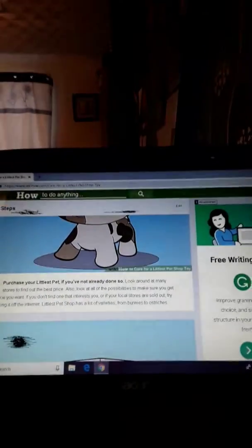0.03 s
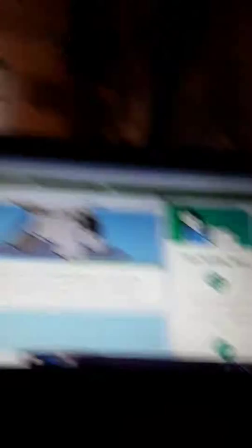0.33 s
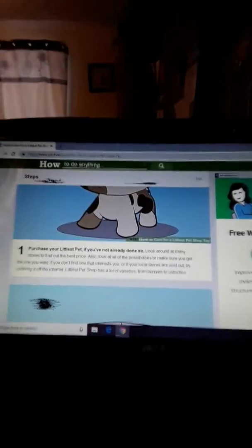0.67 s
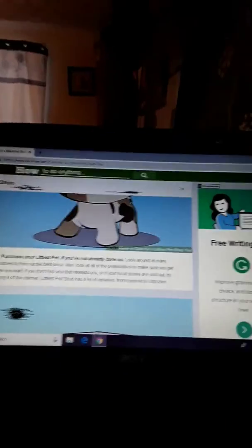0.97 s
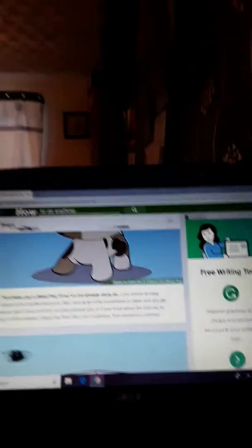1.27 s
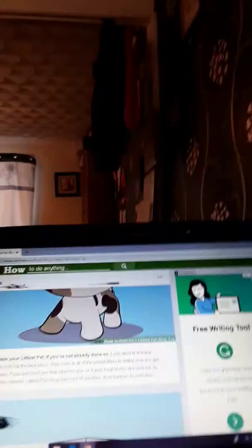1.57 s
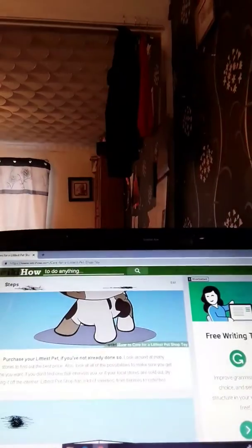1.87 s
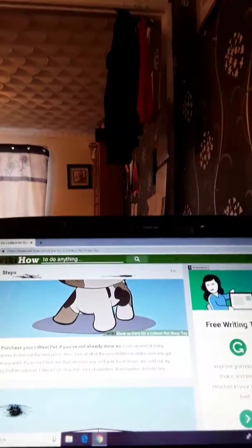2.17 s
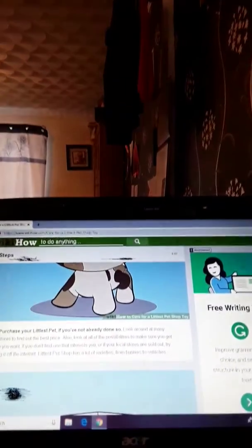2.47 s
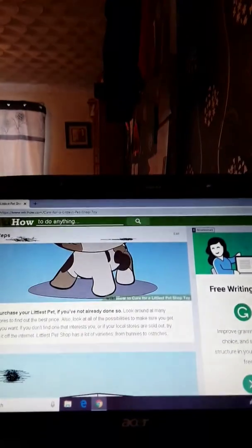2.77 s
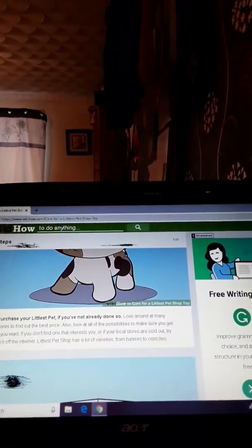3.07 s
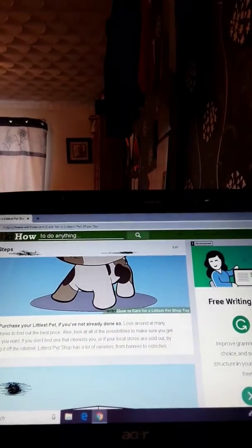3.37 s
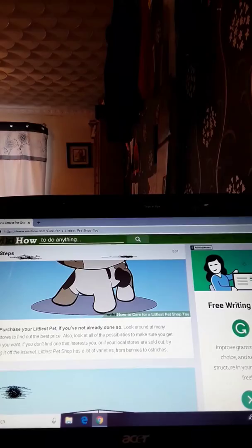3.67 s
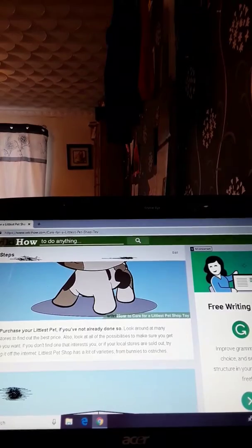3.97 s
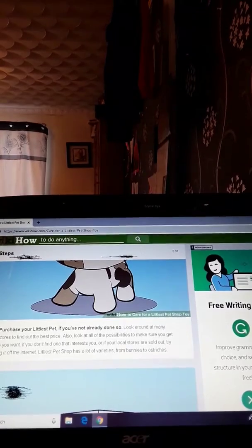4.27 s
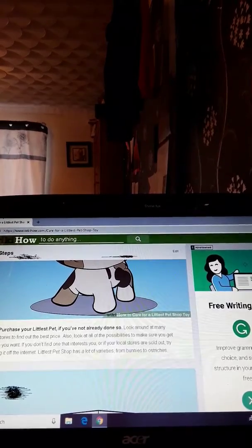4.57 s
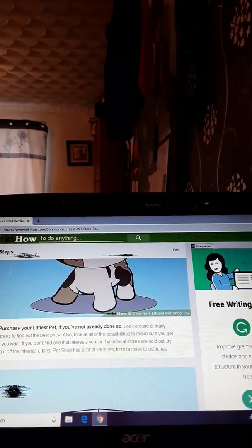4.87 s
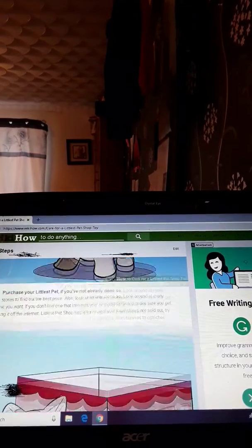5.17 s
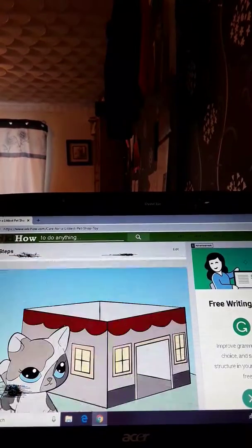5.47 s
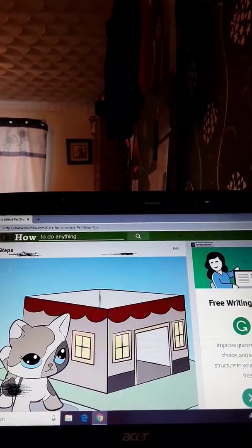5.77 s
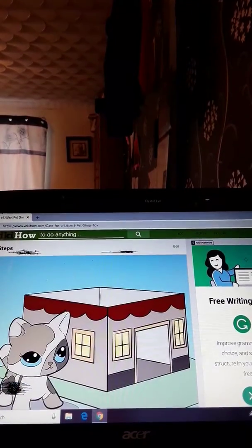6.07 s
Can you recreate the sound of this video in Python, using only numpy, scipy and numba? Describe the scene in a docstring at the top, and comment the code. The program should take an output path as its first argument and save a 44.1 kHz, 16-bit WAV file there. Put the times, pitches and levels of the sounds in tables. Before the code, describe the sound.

Close fingers rub and click on a microphone, then cover it, turning muffled with two heavy bumps and soft taps.

```python
"""Skin rubs and ticks, close and bright, as a hand shifts its grip on a small device in a quiet room. A finger
slides over the microphone port, whose air resonance sinks until everything is muffled. Two heavy shoves boom
and scrape through the case, the fingertip pops softly as it presses and lifts, and the hand settles to a low
rumble."""
import sys
import numpy as np
from scipy import signal
from scipy.fft import rfft, irfft
from scipy.io import wavfile
from scipy.ndimage import uniform_filter1d
from numba import njit

SR = 44100
rng = np.random.default_rng(int(sys.argv[2]) if len(sys.argv) > 2 else 0)


def digitize_waveform(pressure):
    """Quantize a signal to 16-bit integers and store it at the path in sys.argv[1].

    Rows of a 2-D input are taken as channels; values are limited to [-1, 1].
    """
    field = np.atleast_2d(pressure).T
    bounded = np.clip(field, -1, 1)
    quanta = np.round(bounded * 32767).astype(np.int16)
    wavfile.write(sys.argv[1], SR, quanta)


N = 278712
TIME = np.arange(N) / SR
CUTOFF_HZ = 15700

# Tone curves for the noise layers. Each row: frequency in Hz, relative level in dB.
ROOM_TONE = [(240, -29), (400, 0.5), (481, -8), (860, -12.5), (1220, -17.5), (1510, -21), (2360, -22.5),
             (4920, -35), (11600, -32), (15500, -23.5)]
RUMBLE_TONE = [(20, -12.5), (45, -7), (75, -3.5), (110, -7.5), (170, -15.5), (250, -25.5), (400, -37.5),
               (800, -61), (2000, -110)]
DRAG_TONE = [(20, -31.5), (45, -8), (80, 1), (170, 2), (300, -1), (450, -5.5), (700, -14), (1500, -64)]
HISS_TONE = [(1000, -39), (2200, -8), (3400, -4), (5000, -2), (8000, -3), (16000, -0.5)]
OPEN_RASP_TONE = [(150, -20), (350, 2), (600, -3), (1000, -2), (1800, -5), (2800, -9.5), (4000, -15),
                  (6000, -22), (16000, -45)]
COVERED_RASP_TONE = [(150, -11.5), (350, -6.5), (550, 5), (750, 2.5), (1100, -1.5), (1800, -8.5),
                     (2800, -15.5), (5000, -36), (16000, -39.5)]
BOOM_TONE = [(20, -20.5), (42, -24.5), (64, 10.5), (85, 2.5), (130, 6), (230, 0.5), (350, 1.5), (500, -4),
             (700, -23), (1500, -64)]
SCRAPE_TONE = [(250, -20), (500, -8), (750, 4), (1500, -7.5), (2800, -16.5), (5000, -15), (16000, -26)]
# The finger closes the port. Each row: time in seconds, air resonance in Hz, damping as 1/Q.
PORT_CLOSING = [(0, 8210, 0.07), (1.0, 8180, 0.28), (1.42, 8200, 0.21), (1.48, 7160, 0.44),
                (1.53, 5300, 0.59), (1.61, 4840, 0.32), (1.70, 3620, 0.49), (1.80, 2784, 0.73),
                (6.3, 2844, 0.92)]
# Peaks and dips of the case, plus the microphone's thin ring near 15 kHz.
# Each row: centre in Hz, width in Hz, boost in dB.
DEVICE_BANDS = [(122, 61, 3), (220, 8.3, 1), (360, 84, -1), (437, 44, 1), (750, 12, 0), (1620, 55, 1.5),
                (1999, 52, 1.5), (5800, 3900, -0.5), (14910, 1000, 12)]
# A thin, faint whine. Each row: start and end in seconds, centre and width in Hz, level in dB.
WHINE = [(3.13, 3.68, 13700, 504, -82), (3.13, 3.68, 13370, 302, -83.5)]
# Skin grips and chafes, from a broad rasp to a narrow squeak. Each row reads as for the whine.
SQUEAKS = [(0.154, 0.302, 2230, 260, -45), (.385, .45, 3640, 2200, -22.5), (.715, 0.782, 750, 464, -34),
           (.859, .8635, 2350, 2900, -22.5), (.91, 0.952, 1130, 300, -35.5),
           (1.194, 1.216, 3700, 400, -35.5), (1.291, 1.35, 3870, 450, -41.5),
           (1.535, 1.539, 2430, 3350, -28), (1.52, 1.64, 5100, 1380, -42), (1.674, 1.717, 1320, 710, -31.5),
           (3.565, 3.62, 750, 660, -52), (3.72, 3.79, 690, 399, -62.5)]
# The fingertip presses and lifts. Each row: start in seconds, level in dB, pitch in Hz,
# seconds to fade by 60 dB.
POPS = [(0.3, -14.5, 148.8, .018), (0.334, -23.5, 178.9, 0.011), (0.461, -19, 136, .04),
        (1.022, -22, 329.4, 0.055), (1.037, -11.5, 548, 0.013), (1.737, -26, 129, .04),
        (1.803, -24.5, 174, 0.036), (1.806, -20, 800, .005), (1.958, -22.5, 122, 0.058),
        (2.416, -5.5, 99.5, 0.021), (3.107, -20.5, 309, 0.049), (3.209, -20, 301, .049),
        (3.276, -18, 296, 0.047), (3.306, -22, 303, .042), (3.447, -15, 175, 0.075),
        (3.451, -15, 317, 0.024), (3.527, -10, 174, 0.026), (3.527, -23, 317, 0.072),
        (3.58, -15.5, 102.8, 0.09), (4.706, -16.5, 144, 0.016), (4.722, -17, 81, 0.034),
        (4.752, -12.5, 330, 0.018), (4.771, -20, 78.6, 0.099), (4.862, -45.5, 768, 0.012),
        (4.993, -49.5, 750, 0.008)]
# Skin catches and lets go. Each row: start in seconds, tick level in dB, thud level in dB.
TICKS = [(.2927, -4.5, -29.5), (.2992, -9.5, -43), (.458, -10, -32), (.7625, -11, -32), (.8607, -17, -24.5),
         (1.0188, -8, -19), (1.025, -9, -18), (1.0342, -8.5, -22), (1.0385, -4, -28.5), (1.2043, -11, -22),
         (1.344, -6, -35.5), (1.5358, -12, -28), (1.6146, -3, -22), (1.6462, -11.5, -24),
         (1.6692, -10.5, -24.5), (1.7365, -9, -17), (1.744, -15, -39.5), (1.7526, -14.5, -34),
         (1.7604, -5.5, -30), (1.9445, -17.5, -28.5), (1.9584, -19.5, -27.5), (2.0153, -34, -35),
         (2.3854, -25, -37), (2.3958, -21.5, -23), (2.5372, -8, -24), (2.8205, -23, -32.5),
         (3.1367, -20.5, -22.5), (3.1945, -16, -21), (3.3215, -29, -44), (3.366, -20.5, -23.5),
         (3.511, -31.5, -43.5), (3.5815, -34.5, -16), (3.82, -43, -56.5), (4.172, -42.5, -35),
         (4.468, -33, -35.5), (4.4927, -28.5, -24.5), (4.5593, -36.5, -40.5), (4.5901, -34, -32),
         (4.6536, -36.5, -37), (4.723, -27.5, -27), (4.7431, -21.5, -34), (4.7704, -17.5, -26.5),
         (4.794, -25.5, -32), (4.8291, -31, -27), (5.124, -53, -55), (5.707, -45.5, -49)]
# The skin's light touch between strokes. Each row: time in seconds, rasp level in dB.
LIGHT_CONTACT = [(0, -64.5), (.06, -53.5), (.13, -47.5), (.26, -47), (.5, -43), (.99, -44), (1.45, -49),
                 (1.56, -43), (1.75, -47.5), (1.93, -47.5), (2.03, -61), (2.33, -66), (2.92, -56.5),
                 (3.25, -55.5), (3.42, -60), (3.82, -69.5), (4.85, -71.5), (5.4, -82.5)]
# Skin strokes the case. Each row: peak time and length in seconds, rasp, drag and extra hiss in dB.
STROKES = [(0.149, 0.046, -38.5, -40, 3.5), (0.367, 0.19, -43.5, -36.5, 10.5),
           (0.413, 0.073, -21.5, -47, -2), (0.505, 0.26, -40.5, -53, 2), (0.676, 0.078, -34, -42, 1.5),
           (0.754, 0.053, -31, -42, -8), (0.888, 0.12, -32.5, -50, -2.5), (0.92, 0.028, -31, -31.5, -4),
           (1.04, 0.014, -24.5, -32.5, -5), (1.228, 0.37, -44.5, -45.5, 0), (1.397, 0.042, -29.5, -34, -7),
           (1.471, 0.058, -37, -30.5, -8.5), (1.517, 0.056, -33.5, -38, -1.5),
           (1.577, 0.13, -32, -54, -10.5), (1.704, 0.14, -34.5, -36.5, -1), (1.888, 0.053, -40.5, -46.5, 5),
           (2.155, 0.18, -53.5, -42, -2), (2.353, .045, -65.5, -43.5, -1.5), (2.636, 0.029, -48, -36, 7.5),
           (2.694, 0.083, -63, -40.5, -2), (2.744, 0.1, -45.5, -41, 4), (2.817, 0.11, -45.5, -38.5, 0.5),
           (3.052, 0.15, -43, -34, -15), (3.316, 0.063, -53.5, -36.5, -3),
           (3.582, 0.022, -31, -29.5, -39.5), (3.592, 0.11, -48.5, -34, -17),
           (4.479, 0.051, -50.5, -36, -11.5), (4.601, 0.34, -65.5, -55, -3), (4.724, 0.13, -51, -38, -3.5)]
# The case is shoved in the grip. Each row: peak time, rise and fall in seconds, boom and scrape in dB.
SHOVES = [(2.489, 0.077, 0.055, -8.5, -20), (2.594, 0.022, .023, -7.5, -19)]


def from_db(db):
    """Decibels to gain."""
    return 10 ** (np.asarray(db) / 20)


def automation(rows):
    """Draw each column of a timed table as a curve over every sample."""
    times, *columns = np.transpose(rows)
    return [np.interp(TIME, times, column) for column in columns]


def add(out, start_s, sound):
    """Mix a sound in at a moment."""
    i = int(start_s * SR)
    out[i:i + len(sound)] += sound[:N - i]


def swell(peak_s, rise_s, fall_s, shape):
    """Gain of one push, 20 dB down a rise before its peak and a fall after; shape 1 is pointed, 2 a bell."""
    away = np.maximum((peak_s - TIME) / rise_s, (TIME - peak_s) / fall_s)
    return from_db(-20 * np.minimum(away, 10) ** shape)


def colour(x, tone):
    """Shape a signal with a tone curve; rms 1."""
    hz, db = np.transpose(tone)
    bins = np.maximum(np.fft.rfftfreq(N, 1 / SR), 1)
    shaped = irfft(rfft(x) * from_db(np.interp(np.log(bins), np.log(hz), db)), N)
    return shaped / np.std(shaped)


def levelled(x, band_hz, window):
    """Ride the gain so that one band stays at rms 1 over `window` samples."""
    inside = signal.sosfiltfilt(signal.butter(4, band_hz, "band", fs=SR, output="sos"), x)
    return x / np.sqrt(np.abs(uniform_filter1d(inside ** 2, window)) + 1e-12)


def resonate(x, hz, width_hz):
    """Band-pass resonance with gain 1 at its peak."""
    r = np.exp(-np.pi * width_hz / SR)
    feedback = [1, -2 * r * np.cos(2 * np.pi * hz / SR), r * r]
    return signal.lfilter(np.array([1, 0, -1]) * (1 - r * r) / 2, feedback, x)


@njit
def resonant_lowpass(x, hz, damping):
    """Two-pole low-pass whose centre and damping can sweep."""
    warp = np.tan(np.pi * hz / SR)
    low, band_state, low_state = np.zeros(len(x)), 0., 0.
    for i in range(len(x)):
        band = (band_state + warp[i] * (x[i] - low_state)) / (1 + warp[i] * (warp[i] + damping[i]))
        low[i] = low_state + warp[i] * band
        band_state, low_state = 2 * band - band_state, 2 * low[i] - low_state
    return low


def friction(slips_per_s, spread_db, rush):
    """Tiny slips of uneven size at random moments, over a smooth rush."""
    sizes = from_db(spread_db * np.minimum(rng.exponential(1, N), 4)) * rng.choice([-1, 1], N)
    slips = sizes * (rng.random(N) < slips_per_s / SR)
    return slips / np.std(slips) + rush * rng.standard_normal(N)


def coverage(port_hz):
    """How far the finger closes the port, from 0 (open) to 1 (sealed)."""
    return np.clip((np.max(port_hz) - port_hz) / np.ptp(port_hz), 0, 1)


def through_port(x, port_hz, damping, leak_db=-48):
    """The port's air rings, its duct dulls what lies above, and a trace of top leaks through the case."""
    rung = resonant_lowpass(x, port_hz, damping)
    duct_hz = np.minimum(port_hz * 1.2, CUTOFF_HZ)
    dulled = resonant_lowpass(rung, duct_hz, np.full(len(x), np.sqrt(2)))
    return dulled + from_db(leak_db) * np.diff(x, prepend=0)


def through_device(x):
    """The case colours each touch, and the microphone adds its own thin ring near 15 kHz."""
    return x + sum((from_db(db) - 1) * resonate(x, hz, width) for hz, width, db in DEVICE_BANDS)


def room_bed(level_db=-75):
    """A steady bed of quiet room air and the device's own hiss."""
    return from_db(level_db) * colour(rng.standard_normal(N), ROOM_TONE)


def hand_rumble(covered, open_db=-58.5, sealing_db=8):
    """The resting hand rumbles, fuller as the port closes."""
    return from_db(open_db + sealing_db * covered) * colour(rng.standard_normal(N), RUMBLE_TONE)


def whine_or_squeaks(rows):
    """Noise gathers round one pitch for a moment, too uneven to become a tone."""
    out = np.zeros(N)
    for start, end, hz, width, level_db in rows:
        fade = signal.windows.tukey(int((end - start) * SR), 0.5)
        noise = rng.standard_normal(N)[:len(fade)]
        burst = resonate(resonate(noise, hz, width), hz, width)
        add(out, start, from_db(level_db) * fade * burst / np.std(burst))
    return out


def creak_ticks(rasp_gain, count=52, span_s=(1.6, 4.85), over_rasp_db=19.5, ceiling_db=-27):
    """Pressed skin creaks at random, as hard as it rubs: rows for faint ticks with softer thuds."""
    starts = rng.uniform(*span_s, count)
    rasp_db = 20 * np.log10(np.interp(starts, TIME, rasp_gain))
    scatter_db = 3 * np.abs(rng.standard_normal(count))
    tick_db = np.minimum(rasp_db + over_rasp_db, ceiling_db) - scatter_db
    return list(zip(starts, tick_db, tick_db - 10))


def fingertip_pops(attack_s=0.0015, sag=0.029, sag_s=0.002):
    """A soft contact rings the air under the fingertip for a few cycles, sagging in pitch."""
    out, t = np.zeros(N), TIME[:SR // 8]
    for start, level_db, hz, t60 in POPS:
        envelope = (1 - np.exp(-(t / attack_s) ** 2)) * from_db(-60 * t / t60)
        pitch_hz = hz * (1 + sag * (np.exp(-t / sag_s) - 0.5))
        phase = 2 * np.pi * np.cumsum(pitch_hz) / SR
        add(out, start, -from_db(level_db) * envelope / np.max(envelope) * np.sin(phase))
    return out


def skin_ticks(rows, port_hz, damping, crumble_s=0.00074, thud_hz=175, push_db=35):
    """Each release is a sharp step of pressure in the port, followed by a damped swing of the case."""
    out, t, covered = np.zeros(N), TIME[:SR // 16], coverage(port_hz)
    impulse = 1.0 * (t == 0)
    knock = signal.lfilter(*signal.butter(2, 500, fs=SR), impulse)
    for start, tick_db, thud_db in rows:
        i = int(start * SR)
        # on the bare case a release crumbles briefly; on the covered port it is almost clean
        crumble = (1 - covered[i]) * 0.26 + covered[i] * 0.04
        snap = impulse + crumble * (t > 0) * rng.standard_normal(len(t)) * np.exp(-t / crumble_s)
        # a light flick is thin; the more flesh behind it, the stronger the slow push
        flick = signal.lfilter(*signal.butter(1, 2200, "high", fs=SR), snap)
        push = signal.lfilter(*signal.butter(1, [thud_hz, 800], "band", fs=SR), snap)
        pressure = flick + from_db(push_db + thud_db - tick_db) * push
        tick = through_port(pressure, np.full(len(t), port_hz[i]), np.full(len(t), damping[i]),
                            leak_db=-37.5)
        thud = resonate(knock, thud_hz * np.exp(0.33 * rng.standard_normal()), width_hz=130)
        add(out, start, -from_db(tick_db) * tick / np.max(np.abs(tick)))
        add(out, start, -from_db(thud_db) * thud / np.max(np.abs(thud)))
    return out


def stroke_gains(covered):
    """Faders for drag, rasp and hiss: strokes swell out of the light contact and add in power."""
    contact = from_db(automation(LIGHT_CONTACT)[0])
    drag_power = (contact * from_db(-2 + 10 * covered)) ** 2
    rasp_power = hiss_power = contact ** 2
    for peak_s, length_s, rasp_db, drag_db, extra_db in STROKES:
        stroke = swell(peak_s, length_s * 0.65, length_s * 0.74, shape=1.92)
        drag_power = drag_power + (stroke * from_db(drag_db)) ** 2
        rasp_power = rasp_power + (stroke * from_db(rasp_db)) ** 2
        hiss_power = hiss_power + (stroke * from_db(rasp_db + extra_db)) ** 2
    hiss_trim_db = 4.5 - 26 * covered ** 2   # the hiss goes late as the port closes
    return np.sqrt(drag_power), np.sqrt(rasp_power), np.sqrt(hiss_power) * from_db(hiss_trim_db)


def skin_rub(drag_gain, rasp_gain, hiss_gain, port_hz, damping):
    """Sliding skin drags the case, rasps and hisses; over the covered port it is duller and grainier."""
    covered = coverage(port_hz)
    fine = friction(6000, spread_db=2.8, rush=0.8)
    coarse = friction(900, spread_db=3.4, rush=0.75)
    silky = friction(7000, spread_db=0.93, rush=0.93)
    skin = (1 - covered) * colour(fine, OPEN_RASP_TONE) + covered * colour(coarse, COVERED_RASP_TONE)
    grit = colour((1 - covered) * silky + covered * coarse, HISS_TONE)
    # the pressure of the skin wavers, so the rub comes in small surges
    waver = colour(rng.standard_normal(N), [(5, -6), (35, 0), (90, -15), (300, -60)])
    surge_db = (1.83 + 0.51 * covered) * waver
    # the open port lets the slowest pressure escape
    sealed = colour(friction(400, spread_db=3, rush=0.68), DRAG_TONE)
    vented = signal.sosfilt(signal.butter(1, 150, "high", fs=SR, output="sos"), sealed)
    drag = levelled((1 - covered) * vented + covered * sealed, (60, 400), window=2200)
    rasp = levelled(through_port(skin, port_hz, damping), (500, 2800), window=1300)
    hiss = levelled(through_port(grit, port_hz, damping), (3000, 12000), window=1300)
    return drag_gain * drag + from_db(surge_db) * (rasp_gain * rasp + hiss_gain * hiss)


def case_shoves(port_hz, damping, scrape_lag_s=0.0063):
    """The case judders through the grip: coarse slips boom, finer ones scrape and peak just after."""
    judder = friction(450, spread_db=2.7, rush=0.279)
    grit = colour(judder + friction(3000, spread_db=0.77, rush=0.6), SCRAPE_TONE)
    boom = levelled(colour(judder, BOOM_TONE), (40, 600), window=700)
    scrape = levelled(through_port(grit, port_hz, damping), (700, 5000), window=450)
    out = np.zeros(N)
    for peak_s, rise_s, fall_s, boom_db, scrape_db in SHOVES:
        boom_swell = swell(peak_s, rise_s, fall_s, shape=1.96)
        scrape_swell = swell(peak_s + scrape_lag_s, rise_s, fall_s - scrape_lag_s, shape=1.59)
        out += from_db(boom_db) * boom_swell * boom + from_db(scrape_db) * scrape_swell * scrape
    return out


def scene(bass_cut_hz=48, handling_db=-2):
    """The hand's moves, coloured by case and microphone, over rumble, room and a brief whine."""
    port_hz, damping = automation(PORT_CLOSING)
    covered = coverage(port_hz)
    drag_gain, rasp_gain, hiss_gain = stroke_gains(covered)
    touches = skin_ticks(TICKS + creak_ticks(rasp_gain), port_hz, damping) + fingertip_pops()
    # the touches carry no deep bass below about 48 Hz
    touches = signal.sosfilt(signal.butter(2, bass_cut_hz, "high", fs=SR, output="sos"), touches)
    rub = skin_rub(drag_gain, rasp_gain, hiss_gain, port_hz, damping) + whine_or_squeaks(SQUEAKS)
    handling = through_device(touches + rub + case_shoves(port_hz, damping))
    background = hand_rumble(covered) + room_bed() + whine_or_squeaks(WHINE)
    return (background + from_db(handling_db) * handling)[None]


def record(dry):
    """Round off the loudest peaks and cut the very top."""
    rounded = dry / (1 + (dry / 0.95) ** 6) ** (1 / 6)
    return signal.sosfilt(signal.ellip(10, 0.2, 80, CUTOFF_HZ, fs=SR, output="sos"), rounded)


dry = scene()
out = record(dry)
digitize_waveform(out)
```